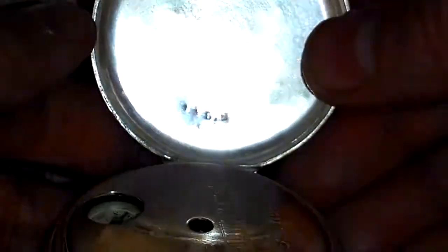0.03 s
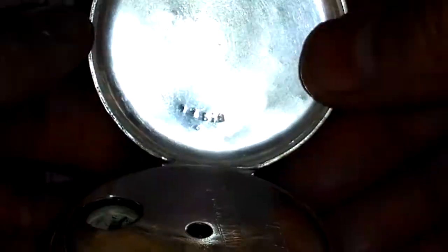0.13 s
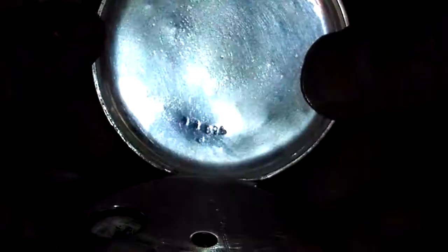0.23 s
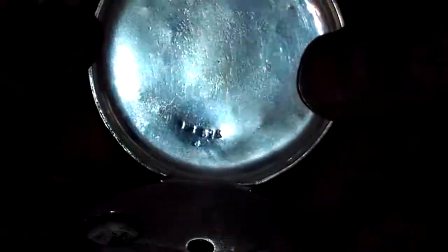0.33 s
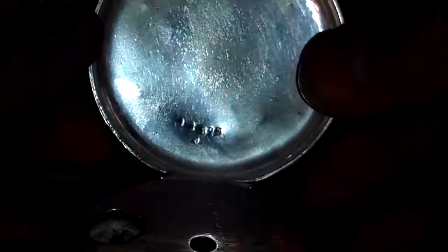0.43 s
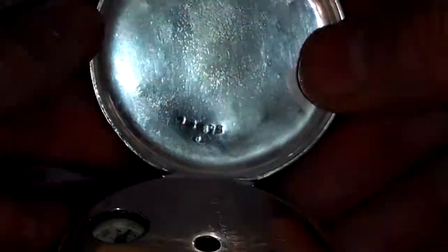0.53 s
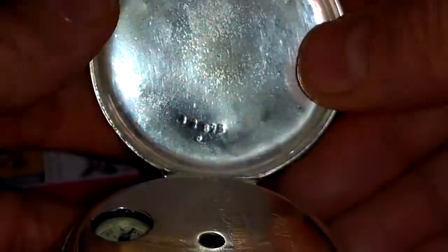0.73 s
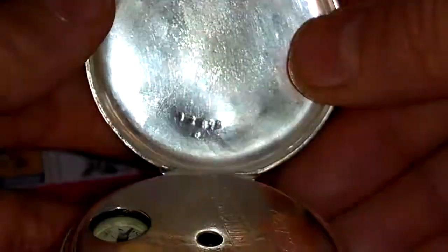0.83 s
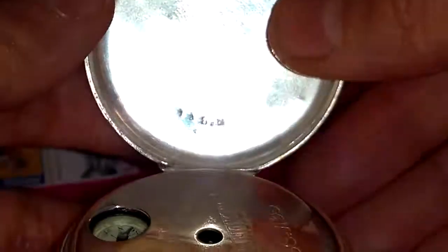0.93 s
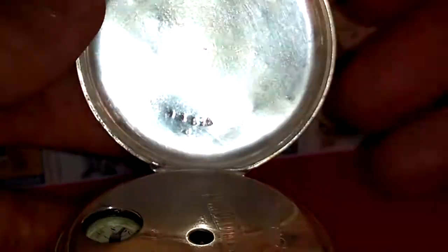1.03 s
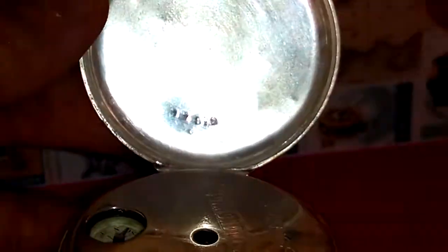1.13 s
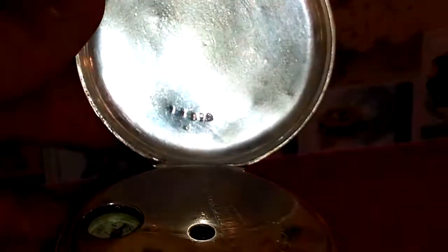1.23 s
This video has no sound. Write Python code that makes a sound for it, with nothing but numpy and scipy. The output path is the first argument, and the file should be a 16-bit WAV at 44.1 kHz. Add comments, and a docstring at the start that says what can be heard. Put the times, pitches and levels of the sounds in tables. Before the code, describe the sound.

A metal pocket watch case gives one sharp knock with a brief, thinly ringing scrape as fingers turn it. Several softer knocks, another scrape and faint finger rubbing follow, close to the microphone in a quiet room.

```python
"""A quiet room: fingers turn an open metal pocket watch case, close by.
The hand-damped case gives one sharp knock and several softer ones, each ringing the lid.
Its rim scrapes twice in bursts of tiny slips and rings thinly. Fingertips bump the case,
ringing the cupped hand, and hiss over the polished metal. The grip rustles dully.
Behind it: short reverberation, room air and a low hum."""
import sys
import numpy as np
from scipy import signal
from scipy.fft import rfft, irfft
from scipy.io import wavfile

SR = 44100
rng = np.random.default_rng(int(sys.argv[2]) if len(sys.argv) > 2 else 0)


def int16_out(signal):
    """Quantize to a 16-bit WAV file."""
    q = np.round(np.clip(np.atleast_2d(signal).T, -1, 1) * 32767)
    wavfile.write(sys.argv[1], SR, q.astype(np.int16))


N = 57330
T = np.arange(N) / SR
HZ = np.fft.rfftfreq(2 * N, 1 / SR)


def amp(db):
    """Decibels to gain."""
    return 10 ** (np.asarray(db) / 20)


def unit_rms(x):
    """Scale to rms 1."""
    return x / np.sqrt(np.mean(x ** 2) + 1e-20)


def curve(points, hz=HZ):
    """Interpolate (f, value) rows on a log-frequency axis."""
    f, value = np.transpose(points)
    return np.interp(np.log(hz + 1), np.log(f + 1), value)


def filtered(x, gain):
    """Apply one gain per bin of HZ."""
    return irfft(rfft(x, 2 * N) * gain)[..., :N]


def noise(gain):
    """Coloured noise, rms 1."""
    return unit_rms(irfft(rfft(rng.standard_normal(2 * N)) * gain)[:N])


def peak(hz, width_hz):
    """Bell-shaped gain; a low-pass when centred on 0 Hz."""
    return 1 / (1 + (2 * (HZ - hz) / width_hz) ** 2)


# hand-damped case modes: f/Hz, level/dB, t60/s
CASE_MODES = [(520, -8, 0.013), (780, -10.5, 0.015), (1124, -21, 0.07), (1307, -21, 0.058),
              (1611, -12, .016), (1820, -12.5, 0.013), (2160, -10, 0.01), (2910, -11, 0.0088),
              (3290, -25, 0.016), (4660, -14.5, 0.012), (6400, -13, 0.0051), (8450, -11, 0.0075),
              (11300, -13, 0.01)]
# knocks and rebounds; the grip sets lid pitch and damping:
# t/s, clack level/dB, high cut/Hz, low cut/Hz, lid level/dB, lid f/Hz, lid t60/s
CASE_KNOCKS = [(0.0389, -34, 2140, 900, -38.5, 1150, .022), (0.0444, -39, 940, 596, -43.5, 942, 0.035),
               (.2120, -15.5, 3680, 680, -15.5, 1113, 0.023), (.2146, -30, 2500, 1200, -27, 1620, .014),
               (.2180, -27.5, 1940, 900, -33, 1270, .012), (.2720, -41, 1140, 1030, -39, 1100, 0.021),
               (.2766, -43, 1500, 1140, -29.5, 1114, 0.029), (0.2829, -41, 1200, 500, -39.5, 1260, 0.015),
               (.8850, -37, 700, 350, -43, 840, 0.024), (0.9497, -30, 695, 400, -37, 876, 0.038),
               (0.96, -46, 900, 650, -44, 956, .045), (1.0838, -33, 616, 503, -40, 854, .045),
               (1.139, -41, 1730, 910, -50.5, 1490, 0.027), (1.2035, -32, 526, 400, -44.5, 700, 0.024)]


def knocks(contact_q=1.3, lid_rise_s=.0005):
    """Each knock clacks the damped case and rings the lid at one hollow pitch."""
    ring = sum(amp(db - 60 * T / t60) * np.sin(2 * np.pi * hz * T) for hz, db, t60 in CASE_MODES)
    lid_attack = np.minimum(T / lid_rise_s, 1)
    out = np.zeros(N)
    for at_s, clack_db, high_cut_hz, low_cut_hz, lid_db, lid_hz, lid_t60 in CASE_KNOCKS:
        high, low = 1j * HZ / high_cut_hz, 1j * HZ / low_cut_hz
        highpass = low ** 2 / (1 + np.sqrt(2) * low + low ** 2)
        lowpass = 1 / (1 + high / contact_q + high ** 2)
        clack = amp(clack_db) * filtered(ring, highpass * lowpass)
        lid = amp(lid_db - 60 * T / lid_t60) * np.sin(2 * np.pi * lid_hz * T) * lid_attack
        start = round(at_s * SR)
        out[start:] += (clack + lid)[:N - start]
    return out


# thin rim modes: f/Hz, level/dB, t60/s
RIM_MODES = [(1720, -11.5, 0.011), (1995, -6.5, 0.024), (2900, -4, .025), (3040, -5, .025),
             (3256, -10, 0.056), (3778, -6.5, 0.03), (3902, -8, 0.061), (4130, -11, 0.029),
             (4490, -7.5, 0.027), (5310, -11, 0.025), (6645, -5.5, 0.035), (8540, -10.5, 0.018),
             (9560, -6, 0.017), (11410, -7, 0.045)]
# dry grit spectrum: f/Hz, level/dB
GRIT_SPECTRUM = [(200, -36), (900, 0), (2400, -13), (4400, 3.5), (6000, -1.5), (7800, 8), (11300, 0),
                 (12500, -34), (16000, -34)]
# scrapes: t/s, level/dB, rise/s, decay/s, tilt/(dB/octave)
RIM_SCRAPES = [(.179, -44.5, 0.0041, 0.0038, 2.5), (0.178, -45.5, 0.015, 0.072, -6),
               (0.216, -56, 0.0034, 0.0054, -5), (.928, -43, 0.0013, 0.012, 0.5),
               (0.934, -43.5, 0.018, 0.045, -8)]


def scrapes(slips_per_s=1400, grit_db=-4):
    """Bursts of tiny slips ring the rim and add dry grit."""
    ring = sum(amp(db - 60 * T / t60) / np.sqrt(t60) * np.cos(2 * np.pi * hz * T)
               for hz, db, t60 in RIM_MODES)
    out = np.zeros(N)
    for at_s, db, rise_s, decay_s, tilt_db in RIM_SCRAPES:
        slips, grains = rng.standard_normal((2, N)) * (rng.random((2, N)) < slips_per_s / SR)
        ringing = unit_rms(signal.fftconvolve(slips, ring)[:N])
        grit = amp(grit_db) * unit_rms(filtered(grains, amp(curve(GRIT_SPECTRUM))))
        tilt = amp(tilt_db * np.log2(np.clip(HZ, 2800, 12000)))
        attack = np.clip((T - at_s) / rise_s, 0, 1)
        decay = np.exp(-np.maximum(T - at_s - rise_s, 0) / decay_s)
        out += amp(db) * unit_rms(filtered(ringing + grit, tilt)) * attack * decay
    return out


# rim catches: t/s, level/dB, f/Hz, t60/s
RIM_PINGS = [(0.2162, -41, 3885, 0.071), (0.9552, -44.5, 3860, 0.075)]


def pings(rise_s=.0015):
    """The rim catches and one thin mode rings out briefly."""
    out = np.zeros(N)
    for at_s, db, hz, t60 in RIM_PINGS:
        age_s = np.maximum(T - at_s, 0)
        attack = np.minimum(age_s / rise_s, 1)
        out += amp(db - 60 * age_s / t60) * np.sin(2 * np.pi * hz * age_s) * attack
    return out


# fingertip bumps: t/s, level/dB, f/Hz, half-width/cycles
FINGER_BUMPS = [(0.2804, -39, 318, 1.2), (0.2895, -27, 393, 0.61), (.8910, -40, 384, 0.68),
                (0.952, -35, 300, 0.6), (1.087, -40, 238, 1.3), (1.204, -33.5, 222, 0.78)]
# cupped-hand resonances: f/Hz, width/Hz, gain/dB
HAND_MODES = [(290, 35, -4), (414.6, 19, -1)]


def bumps():
    """A fingertip pushes the case: a dull swing of a cycle or two rings the cupped hand."""
    push = np.zeros(N)
    for at_s, db, hz, half_width in FINGER_BUMPS:
        cycles = (T - at_s) * hz
        push += amp(db) * np.exp(-(cycles / half_width) ** 2) * np.sin(2 * np.pi * cycles)
    hollow = sum(amp(db) / (1 + 2j * (HZ - hz) / width_hz) for hz, width_hz, db in HAND_MODES)
    return push + filtered(push, hollow)


# sliding skin spectrum: f/Hz, level/dB
SKIN_SPECTRUM = [(500, 3.5), (1500, 7.5), (3500, 2.5), (5000, -7), (6100, 3.5), (9200, 7.5), (11000, 2),
                 (15500, -0.5)]
# slides: t/s, level/dB, rise/s, hold/s, release/s, tilt/(dB/octave), squeak before tilt/dB
SKIN_SLIDES = [(0.106, -55.5, 0.0028, 0.0033, 0.0056, -6.5, -6),
               (0.304, -53.5, 0.0023, 0.011, 0.005, -3, -5), (0.703, -58, .003, 0.0042, 0.0074, -2, -12),
               (0.705, -53, 0.0047, 0.0026, 0.0054, 5, 7), (0.902, -60.5, 0.0051, .002, 0.011, 21, 2),
               (0.993, -54.5, 0.077, 0.048, .006, -1, -14), (1.098, -50.5, 0.0059, 0.014, 0.0057, -9, 18),
               (1.117, -50.5, 0.0065, 0.022, 0.005, -3, -24), (1.149, -52, 0.0012, 0.001, 0.006, 0, -20)]


def slides(grain_db=3.0, squeak_hz=9070):
    """Skin hisses unevenly over the polished metal; some slides squeak faintly."""
    out = np.zeros(N)
    for at_s, db, rise_s, hold_s, release_s, tilt_db, squeak_db in SKIN_SLIDES:
        hiss = noise(amp(curve(SKIN_SPECTRUM)))
        grain = amp(grain_db * noise(peak(0, width_hz=530)))
        squeak = amp(squeak_db) * noise(peak(squeak_hz, width_hz=350))
        tilt = amp(tilt_db * np.log2(np.clip(HZ, 1600, 9000)))
        rub = unit_rms(filtered(unit_rms(hiss * grain) + squeak, tilt))
        attack = np.clip((T - at_s) / rise_s, 0, 1) ** 2
        release = np.exp(-np.maximum(T - at_s - rise_s - hold_s, 0) / release_s)
        out += amp(db) * rub * attack * release
    return out


# rustle envelope: t/s, level/dB
GRIP_ENVELOPE = [(0, -52), (.06, -55), (.13, -67), (.35, -55.5), (.56, -69), (.68, -55.5), (.84, -58.5),
                 (.95, -46), (1.0, -55.5), (1.15, -52.5), (1.3, -56)]
# rustle spectrum: f/Hz, level/dB
GRIP_SPECTRUM = [(40, -39), (100, 7), (160, -4.5), (220, 1.5), (280, 0), (360, -1), (600, -8), (900, -17.5),
                 (1400, -23.5), (4000, -28.5), (15000, -40)]


def grip():
    """The hands rustle dully as they shift."""
    return amp(np.interp(T, *np.transpose(GRIP_ENVELOPE))) * noise(amp(curve(GRIP_SPECTRUM)))


# room tail: f/Hz, t60/s, level/dB
REVERB_BANDS = [(157, 0.079, -5.5), (680, 0.43, -10.5), (1090, 0.5, -14.5), (2080, 0.46, -10),
                (3000, .27, -9), (3900, 0.66, -12), (8300, 0.44, -9), (15200, .2, -50)]


def reverb(x, gap_s=0.0076):
    """The room's diffuse tail dies at its own rate in each band."""
    hz, t, bands = signal.stft(rng.standard_normal(N), SR, nperseg=256)
    t60 = curve([(f, s) for f, s, _ in REVERB_BANDS], hz)[:, None]
    level_db = curve([(f, db) for f, _, db in REVERB_BANDS], hz)[:, None]
    energy_norm = np.sqrt(2 * np.log(1000) / (t60 * SR))
    bands = bands * amp(level_db - 60 * t / t60) * energy_norm
    tail = signal.istft(bands, SR, nperseg=256)[1][:N] * (T > gap_s)
    return signal.fftconvolve(x, tail)[:N]


# room air spectrum: f/Hz, level/dB
AIR_SPECTRUM = [(20, -30), (42, -23), (65, -2), (120, 0.5), (230, -2.5), (330, -5.5), (600, -12),
                (1100, -19.5), (2000, -19), (3500, -24.5), (4500, -27), (6000, -33.5), (8400, -28),
                (10000, -35), (14800, -34.5), (15800, -59)]


def air(level_db=-52, waver_db=1.5):
    """Gently wavering room noise."""
    envelope = amp(level_db + waver_db * noise(peak(0, width_hz=24)))
    return envelope * noise(amp(curve(AIR_SPECTRUM)))


# room hum tones: f/Hz, level/dB
HUM_TONES = [(118, -58.5), (149.5, -59.5), (224, -58)]
# hum swell: t/s, gain/dB
HUM_ENVELOPE = [(.08, 0.5), (.28, -3.5), (.4, 3.5), (.55, -3), (.71, 4.5), (.8, -4), (.95, -2), (1.04, 2.5),
                (1.3, 3)]


def hum(waver_rad=1.13, waver_width_hz=14.5):
    """Three low tones waver in phase, swelling and sinking together."""
    tones = np.zeros(N)
    for hz, db in HUM_TONES:
        phase = 2 * np.pi * (hz * T + rng.random())
        waver = waver_rad * noise(peak(0, waver_width_hz))
        tones += amp(db) * unit_rms(np.sin(phase + waver))
    return tones * amp(np.interp(T, *np.transpose(HUM_ENVELOPE)))


# right channel against left: f/Hz, phase/rad
RIGHT_PHASE = [(0, 3), (900, 0.15), (1450, 0.53), (1950, -2.5), (2850, -3), (3200, -8.5), (4100, -4.5),
               (4600, -10), (5100, -8.5), (5800, -13.5), (6500, -11.5), (8500, -7), (9700, -1.5),
               (11500, 1.4), (12200, -2.5), (13900, -3), (15500, -10)]


def stereo(x):
    """One sound reaches the two channels with different phase."""
    phase_rad = np.interp(HZ, *np.transpose(RIGHT_PHASE))
    return np.array([x, filtered(x, np.exp(1j * phase_rad))])


# diffuse sound independent in each channel: f/Hz, amplitude share/(0-1)
STEREO_SPREAD = [(40, 0.52), (130, 0.58), (350, 0.64), (1200, 0.29), (2500, 0.29), (4000, 0.56),
                 (8000, 0.3), (14000, 1)]


def scene():
    """Hits are common to both channels; friction and room sound partly differ."""
    hits = knocks() + bumps() + pings()
    rubs = [scrapes() + slides() for _ in range(3)]
    common, left, right = [rub + air() + hum() + grip() + reverb(hits + rub) for rub in rubs]
    spread = np.clip(curve(STEREO_SPREAD), 0, 1)
    centre = hits + filtered(common, np.sqrt(1 - spread ** 2))
    return stereo(centre) + filtered(np.array([left, right]), spread)


# left minus right: f/Hz, level/dB
BALANCE = [(60, -5.5), (87, 3.5), (130, -3), (180, -3), (260, 0.0), (380, -0.5), (550, -0.5), (790, -1.5),
           (1140, -0.5), (1650, -2.5), (2380, -1.5), (3440, -3.5), (4970, -2), (7180, -3.5), (10400, -4.0),
           (15000, -5.5)]


def record(dry):
    """Balance leaning slightly right, then a steep low-pass."""
    balance_db = curve(BALANCE)
    balanced = filtered(dry, amp(np.array([balance_db, -balance_db]) / 2))
    lowpass = signal.firwin(511, cutoff=15550, window=("kaiser", 9), fs=SR)
    return signal.oaconvolve(balanced, lowpass[None], "same")


dry = scene()
out = record(dry)
int16_out(out)
```